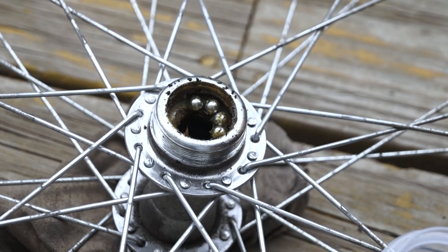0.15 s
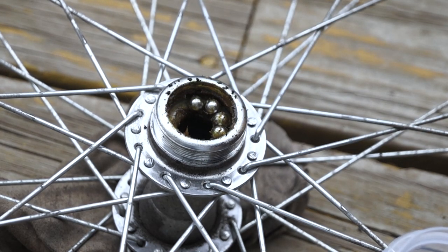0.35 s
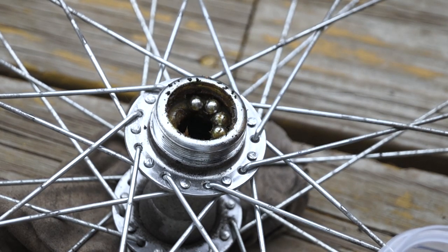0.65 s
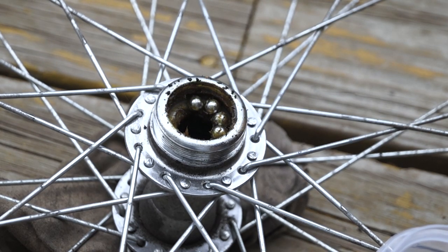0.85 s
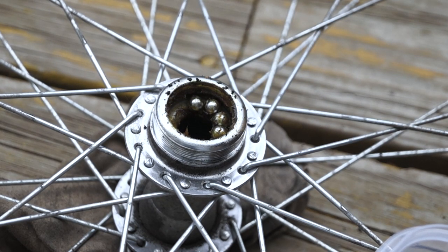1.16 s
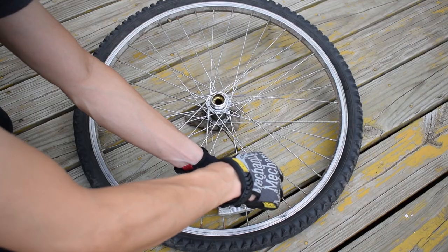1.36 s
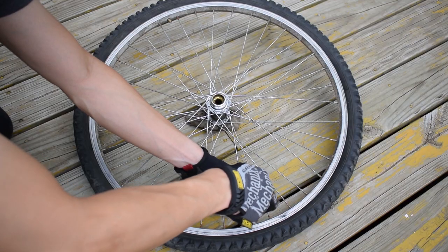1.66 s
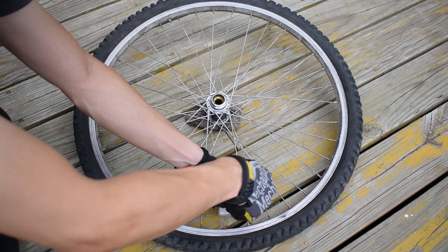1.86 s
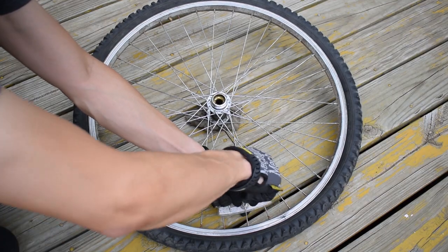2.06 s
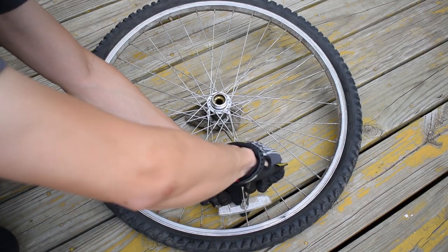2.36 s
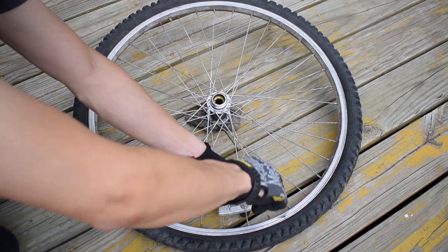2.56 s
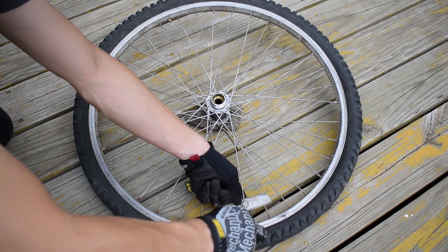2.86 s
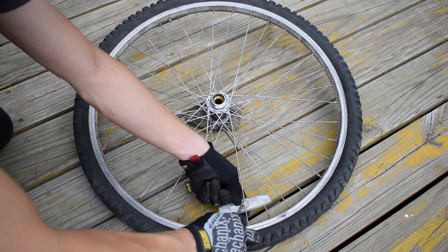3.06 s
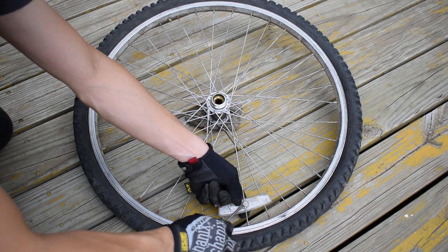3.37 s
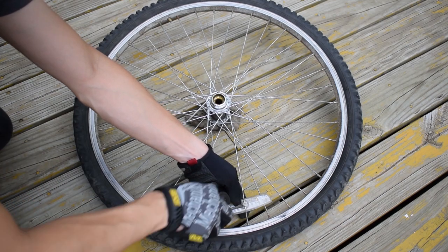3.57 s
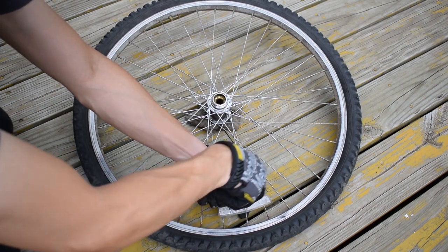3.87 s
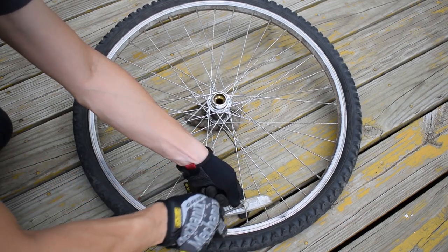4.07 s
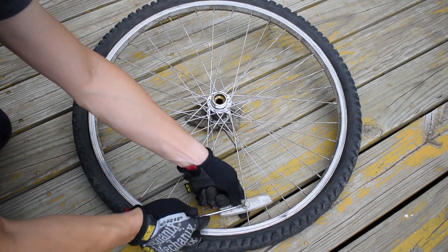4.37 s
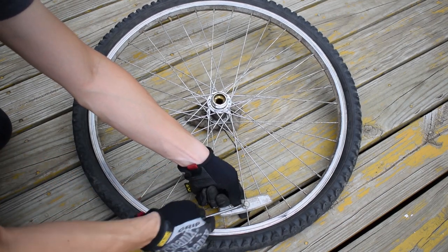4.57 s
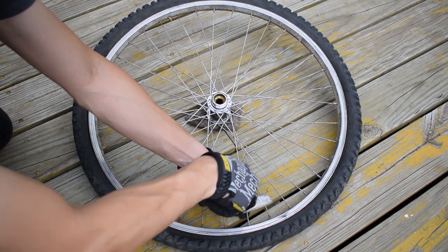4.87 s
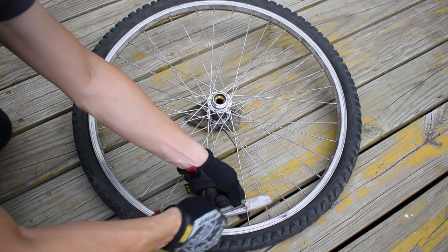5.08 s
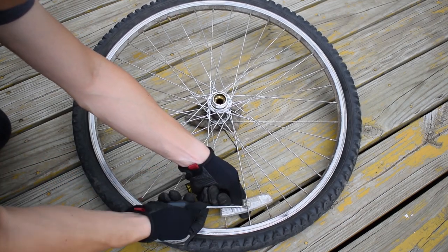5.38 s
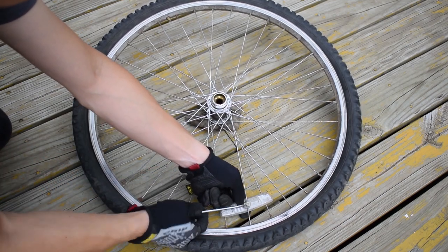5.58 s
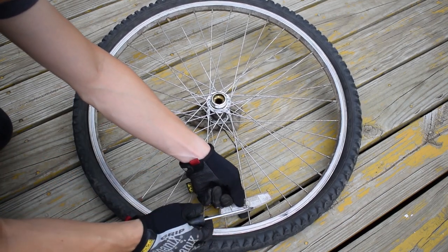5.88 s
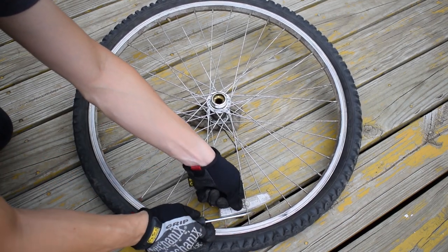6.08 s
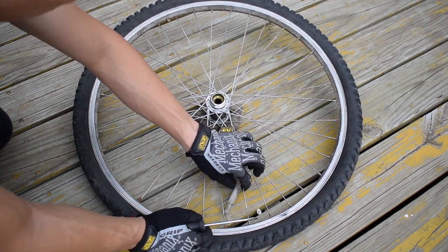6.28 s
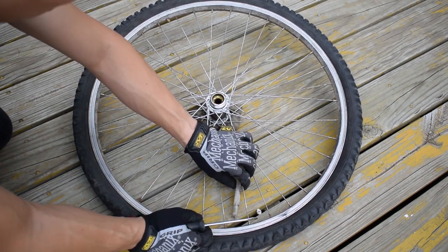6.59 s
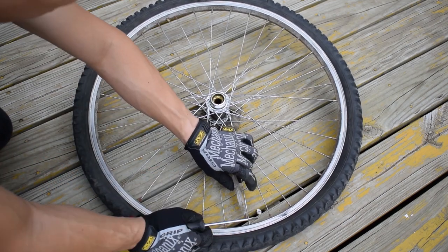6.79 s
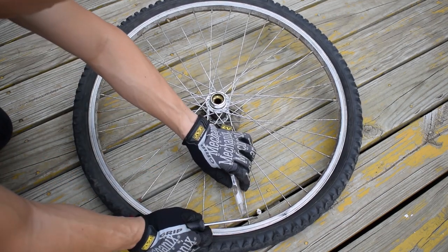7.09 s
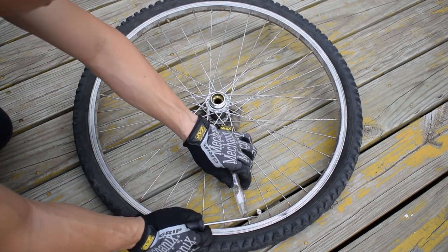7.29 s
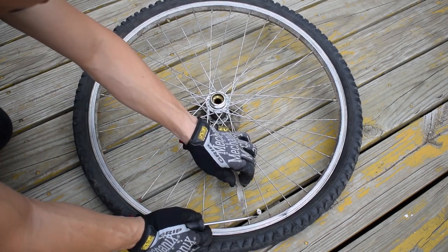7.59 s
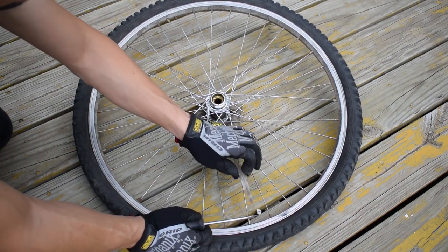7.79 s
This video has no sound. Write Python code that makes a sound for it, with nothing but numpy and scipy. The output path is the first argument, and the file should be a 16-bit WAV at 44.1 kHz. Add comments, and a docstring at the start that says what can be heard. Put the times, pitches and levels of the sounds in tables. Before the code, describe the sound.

Gloved hands work a small metal tool among bicycle spokes on a wooden deck, with sharp clinks, thumps, faint scrapes and quiet air.

```python
"""Tool among bicycle spokes

Gloved hands work a small tool between the spokes of a bicycle wheel lying on a wooden deck.
Struck and dragged steel sounds as sums of decaying modes driven by trains of impulses; the tyre thumps on
the boards as slowly pushed low modes, gloves rub as dense grains, and wind is low noise swelled by gusts.
A duller, wider air of shaped noise, with one knock late in it, cross-fades into the air at the wheel."""
import sys
import numpy as np
from scipy import signal
from scipy.io import wavfile
from scipy.ndimage import uniform_filter1d

SR = 44100
rng = np.random.default_rng(int(sys.argv[2]) if len(sys.argv) > 2 else 0)


def field_ratio(decibels):
    """Amplitude ratio for a level in dB (20 dB per decade); scalars and array-likes work."""
    return 10 ** (np.asarray(decibels, dtype=float) / 20)


def unload_audio(sound):
    """Save the sound as a 16-bit wav file, at the path given as the first command line argument."""
    columns = np.transpose(np.atleast_2d(sound))
    # keep every value between -1 and 1, then stretch to whole-number steps
    steps = np.round(np.clip(columns, -1, 1) * 32767)
    wavfile.write(sys.argv[1], SR, steps.astype(np.int16))


N = 350176
T = np.arange(N) / SR
TWINS = 6  # neighbouring spokes are tuned nearly alike, so each long mode is a small cluster


def evened(x):
    """Normalisation of power: scales to rms 1."""
    return x / np.sqrt(np.mean(x ** 2) + 1e-20)


def read(points, hz):
    """Interpolation of a spectrum on a logarithmic frequency axis."""
    f, value = np.transpose(points)
    return np.interp(np.log(hz + 1), np.log(f + 1), value)


def add(mix, s, sound):
    """Superposition: mixes a sound in at time s."""
    part = mix[round(s * SR):][:len(sound)]
    part += sound[:len(part)]


def rings(hz, t60, phase, size):
    """Free vibration of damped modes: one exponentially dying sine a row, phase in cycles."""
    t = np.arange(size) / SR
    decay = field_ratio(-60 * t / np.c_[t60])
    return decay * np.sin(2 * np.pi * (np.c_[hz] * t + np.c_[phase]))


def peaked(x, db):
    """Peak level: sets the top of the 2 ms envelope to db."""
    return field_ratio(db) * x / np.sqrt(2 * uniform_filter1d(x ** 2, size=88).max())


def thin(x):
    """Weak radiation: thin wire moves little air at low pitch."""
    return signal.sosfilt(signal.butter(5, 1300, "high", fs=SR, output="sos"), x)


def spot_colour(f, pitch_hz, treble_db, boost_db, octaves, overtone, partner):
    """Selective excitation: a spot favours modes near its two pitches; a hard contact adds treble."""
    near = 0
    for pitch, weight in ((pitch_hz, 1), (overtone * pitch_hz, partner)):
        near = near + weight * np.exp(-(np.log2(f / pitch) / octaves) ** 2)
    treble = (treble_db + 21.0) * np.clip(np.log2(f / 5000), 0, 1)
    return field_ratio(boost_db * np.minimum(near, 1) + treble)


def steel(pitch_hz, treble_db, ring_db, overtone, boost_db, octaves):
    """Modal response of the wheel, a row per spot: swarm of short modes, crack, long modes."""
    # long modes of rim and tensioned spokes: pitch_hz, relative level_db, t60_s
    wheel = [(1416, -15, .25), (1495, -11, .2), (1583, -17, .35), (1768, -7, .34), (1960, -16, .3),
             (2085, -9, .22), (2245, -12, .28), (2360, -11, .32), (2471, -11, .3), (2860, -15, .16),
             (3070, -15, .18), (3340, -13, .2), (3590, -15, .19), (4500, -17, .08)]
    # envelope of the countless short modes: pitch_hz, relative level_db
    swarm_levels = [(1100, -19), (1450, -6), (2730, -6.5), (4400, -6.5), (5000, -13), (5700, -13.5),
                    (6500, -14.5), (9330, -15.5), (14000, -25), (16500, -52)]
    # decay of the short modes: pitch_hz, t60_s
    swarm_t60 = [(1740, 0.097), (3000, 0.069), (4590, 0.043), (12100, 0.023)]
    count, size = 400, SR // 2
    hz = np.geomspace(1000, 16500, num=count) * rng.uniform(.995, 1.005, count)
    long_hz, long_db, long_t60 = np.repeat(wheel, TWINS, axis=0).T

    chance = rng.standard_normal((len(pitch_hz), 2 * count + len(long_hz)))
    chance = np.sign(chance) * np.sqrt(abs(chance))  # every mode takes part, with either sign
    swarm_chance, crack_chance, long_chance = np.split(chance, [count, 2 * count], axis=1)

    share = spot_colour(hz, pitch_hz, treble_db, boost_db, octaves, overtone, partner=0.73)
    share = share * field_ratio(read(swarm_levels, hz)) * np.sqrt(hz / 3000)  # log-spread: fewer modes per Hz up high
    t60 = read(swarm_t60, hz) * rng.uniform(.8, 1.25, count)
    swarm = share * swarm_chance @ rings(hz, t60, 0 * hz, size)
    crack = share * crack_chance @ rings(hz, np.full(count, .014), 0 * hz, size)

    # the spoke touched rings most
    picked = spot_colour(long_hz, pitch_hz, treble_db, 12, octaves=.055, overtone=1.395, partner=.65)
    spot = field_ratio(2.5 * long_chance) * (-1) ** np.arange(len(long_hz))
    twin_hz = long_hz + 22 * rng.standard_normal(len(long_hz))
    long = picked * field_ratio(long_db + ring_db) * spot @ rings(twin_hz, long_t60, 0 * long_hz, size)
    return swarm, crack, long


def clinks():
    """Impact excitation: each strike is one blow, a quick chatter and one rebound."""
    # tool or spoke strikes steel: start_s, peak_db (dry), pitch_hz of the struck spot,
    # treble_db (on a scale where -21 is neutral), ring_db of the long modes
    strikes = [(0.9, -39.5, 3300, -26, 2), (1.0391, -36, 3270, -33, -13), (1.739, -15.5, 4300, -24, -14),
               (1.745, -19.5, 3530, -27, 0), (1.857, -37, 1990, -41, 2.5), (1.912, -44, 2920, -16, 8),
               (2.439, -20, 1724, -31, -2), (2.783, -39.5, 2580, -27, -13), (2.896, -29.5, 1940, -46, 2),
               (3.116, -26.5, 3040, -22.5, -18), (3.7331, -32.5, 2760, -21, 7),
               (3.949, -9, 2770, -16.5, -16), (3.952, -12, 1828, -35, 6.5), (4.0971, -16.5, 2630, -21, -11),
               (4.114, -2, 2820, -13, -7), (4.3637, -36, 2900, -35, -22), (4.478, -39.5, 3000, -37, -20),
               (4.541, -38.5, 1850, -38, -12), (4.686, -34.5, 4000, -38, -14), (5.162, -44, 1600, -23, -14),
               (5.2585, -10, 2330, -24, -10.5), (5.6623, -37.5, 2340, -22, 0),
               (5.7999, -31.5, 3570, -32, -3), (6.2877, -23.5, 2320, -29, 3),
               (6.743, -25, 2700, -11.5, -12)]
    rebound_s, rebound_db = .012, -10  # the springy wire throws the tool back for a second, softer blow
    start_s, peak_db, *spot = np.array(strikes).T[:, :, None]
    swarm, crack, long = steel(*spot, overtone=1.466, boost_db=9.5, octaves=0.2)
    t, out = np.arange(1500) / SR, np.zeros(N)
    rise = np.minimum(np.arange(swarm.shape[1]) / (0.00018 * SR), 1)  # contact lasts under a millisecond
    for k, body in enumerate(thin(rise * (swarm + field_ratio(12) * crack + long))):
        hit = rng.random(len(t)) < 600 / SR
        blows = .28 * hit * rng.standard_normal(len(t)) * np.exp(-t / .011)
        blows[[0, round(rebound_s * SR)]] = 1, field_ratio(rebound_db)
        add(out, start_s[k, 0], peaked(signal.fftconvolve(body, blows), peak_db[k, 0]))
    return out


def scrapes():
    """Stick-slip excitation: many small uneven slips under one stroke that rises fast and fades."""
    # wire drags over wire: start_s, peak_db (dry), pitch_hz, length_s, ring_db of the long modes
    drags = [(0.92, -44.5, 3480, 0.048, -6), (1.529, -47, 1910, 0.041, -14), (1.707, -38, 3900, 0.011, -8),
             (1.712, -39, 2190, 0.017, -3), (2.722, -37, 3360, 0.02, 1.5), (3.827, -33.5, 2540, 0.043, -19),
             (4.323, -43, 2170, 0.037, -15), (4.487, -39.5, 1960, 0.0082, -26),
             (5.24, -41.5, 2900, 0.01, -12), (5.559, -46.5, 3270, 0.038, -11),
             (5.628, -42, 3020, 0.032, -9), (5.8, -41.5, 1740, 0.029, -9), (6.077, -50.5, 2800, 0.18, -18),
             (6.286, -25, 3180, 0.046, -4), (6.296, -40, 1416, 0.045, 16), (6.311, -46, 1930, 0.034, -6),
             (7.675, -38.5, 2880, 0.026, -2), (7.695, -46, 2140, 0.022, 12), (7.741, -39.5, 1680, 0.029, 7),
             (7.763, -38, 2260, 0.054, -5), (7.785, -38, 2950, 0.041, -3), (7.797, -44, 3600, 0.038, 9)]
    start_s, peak_db, pitch_hz, length_s, ring_db = np.array(drags).T[:, :, None]
    # a dragged spoke sings in a band
    swarm, crack, long = steel(pitch_hz, -27, ring_db, overtone=1.18, boost_db=11.5, octaves=.16)
    out = np.zeros(N)
    for k, body in enumerate(thin(swarm + field_ratio(4.5) * crack + long)):
        u = np.arange(8000) / SR / length_s[k, 0]  # 0 to 1 along the stroke
        slips = (rng.random(len(u)) < 1200 / SR) * rng.standard_normal(len(u))
        stroke = np.clip(u / 0.15, 0, 1) * np.clip((1 - u) / 1.12, 0, 1)
        add(out, start_s[k, 0], peaked(signal.fftconvolve(body, slips * stroke), peak_db[k, 0]))
    return out


def rattles():
    """Repeated impact: each touch on the rim rings the tool's modes in its own mix, then jitters to rest."""
    # touches of the loose tool: start_s, peak_db (dry), ring_db of the long modes
    touches = [(6.7448, -26, -4), (6.747, -25, 6), (6.7507, -21, 4), (6.7636, -22.5, 0), (6.999, -33, -12),
               (7.007, -35, -10), (7.02, -37.5, -12)]
    # modes of the tool: pitch_hz, relative level_db, t60_s
    tool = [(1406, -20, 0.22), (1509, -12, 0.17), (2250, -19, 0.12), (2471, -22, 0.67), (2418, 9.5, 0.041),
            (2700, 0.5, 0.035), (2950, 8.5, 0.026), (3265, -12, .14), (3900, -4, 0.023), (4800, -6, 0.039),
            (5720, 0, 0.016)]
    hz, db, t60 = np.repeat(tool, TWINS, axis=0).T
    long = t60 > .1
    hz = hz * (1 + np.where(long, .003, .03) * rng.standard_normal(len(hz)))  # short modes: loose clusters
    t, out = np.arange(1200) / SR, np.zeros(N)
    for start_s, peak_db, ring_db in touches:
        share = field_ratio(db + ring_db * long) * rng.standard_normal(len(hz))
        body = share @ rings(hz, t60, 0 * hz, SR // 2)
        hit = rng.random(len(t)) < 500 / SR
        blows = 0.42 * hit * rng.standard_normal(len(t)) * np.exp(-t / 0.018)
        blows[0] = 1
        add(out, start_s, peaked(signal.fftconvolve(body, blows), peak_db))
    return out


def taps():
    """Heavily damped plate modes: short dull rings of the plank, a little different at each spot."""
    # knuckle or tool ticks on wood: start_s, peak_db (dry)
    ticks = [(2.438, -34.5), (2.894, -39), (3.949, -18.5), (4.333, -41), (4.365, -35.5), (4.477, -36.5),
             (4.49, -32.5), (4.541, -39), (5.401, -42), (5.633, -36), (5.65, -39), (5.662, -31.5),
             (5.675, -42)]
    # modes of the plank: pitch_hz, relative level_db, t60_s
    plank = [(526, -4.5, 0.012), (750, 2, 0.0069), (1180, 0, 0.0074), (1708, -11.5, 0.032)]
    hz, db, t60 = np.transpose(plank)
    share = field_ratio(db) * (-1) ** np.arange(len(hz))
    out, spots = np.zeros(N), rng.uniform(0.92, 1.16, (len(ticks), len(hz)))
    for (start_s, peak_db), spot in zip(ticks, spots):
        add(out, start_s, peaked(share @ rings(hz * spot, t60, 0 * hz, size=3000), peak_db))
    return out


def deck(x):
    """Reverberation: boards, rail and wall scatter each sound into a short dense tail."""
    t = np.arange(SR // 3) / SR
    tail = rng.standard_normal(len(t)) * field_ratio(-60 * t / 0.18) * (t > .003)
    tail = signal.sosfilt(signal.butter(1, 4000, fs=SR, output="sos"), tail)
    return x + field_ratio(-17.5) * signal.oaconvolve(x, tail / np.linalg.norm(tail))[:N]


def thumps():
    """Soft impact: a rubber push swells the low modes of tyre and boards over a few milliseconds."""
    # tyre and rim bump the boards: start_s, peak_db, deep_db (gain of the modes below 240 Hz)
    bumps = [(1.742, -30.5, 8.5), (2.441, -28, 4.5), (2.459, -27, 7), (2.495, -36.5, -5),
             (3.834, -27.5, 8.5), (3.951, -20, -5), (4.117, -34.5, -7), (4.333, -37.5, 7), (4.49, -33.5, 7),
             (4.859, -39.5, 7), (5.633, -37.5, -9), (5.664, -38, 17), (6.29, -43, 3), (6.756, -36, 0)]
    # modes of the boards: pitch_hz, relative level_db, t60_s
    boards = [(108, -7.5, 0.27), (205, 2.5, 0.048), (264, 2, 0.14), (304, 3.5, 0.28), (339, -0.5, 0.13),
              (375.8, 1, 0.18), (465, -9.5, 0.18), (644, -8, 0.088), (756, -12, 0.15), (1010, -11, 0.19)]
    hz, db, t60 = np.transpose(boards)
    t, out = np.arange(SR // 2) / SR, np.zeros(N)
    push = 1 - np.exp(-(t / 0.0048) ** 2)
    spots, phases = rng.standard_normal((2, len(bumps), len(hz)))
    for (start_s, peak_db, deep_db), spot, phase in zip(bumps, spots, phases):
        share = field_ratio(db + 2.5 * spot + deep_db * (hz < 240))
        spot_hz = hz * (1 + .015 * spot[::-1])  # each spot of the boards is tuned a little apart
        body = share @ rings(spot_hz, t60, phase, len(t))
        add(out, start_s, peaked(body * push, peak_db))
    return out


def rubbing():
    """Granular friction: dense tiny slips of cloth on wire, each a short ringing grain."""
    # gloves working on wire: start_s, level_db (rms before the silent opening is cut)
    rub = [(.85, -66), (2.1, -83), (3.6, -100), (4.2, -64.5), (5.0, -61.5), (5.8, -69), (6.8, -62.5),
           (7.94, -68)]
    slips = (rng.random(N) < 5000 / SR) * rng.standard_normal(N) * field_ratio(1.5 * rng.exponential(1, N))
    hz = np.geomspace(2500, 4500, num=16)
    kind = rng.integers(0, len(hz), N)
    grains = rings(hz, np.full(len(hz), .012), 0 * hz, size=1200)
    stir = sum(signal.oaconvolve(slips * (kind == k), grain)[:N] for k, grain in enumerate(grains))
    return field_ratio(np.interp(T, *np.transpose(rub))) * (T > rub[0][0]) * evened(stir)


def knock():
    """Impact with early scattering: one dry knock a little to the right with a short blur of echoes."""
    # the knock: start_s, peak_db (mean of both sides), left_minus_right_db
    blow = [(1.3479, -13.5, -2)]
    # modes of the knocked body: pitch_hz, relative level_db, t60_s
    knocked = [(691, -22, 0.15), (1005, -9, 0.14), (1500, -20, 0.09), (534, -25, .05), (790, -3, 0.016),
               (1110, 12, 0.0068), (1850, 13, 0.0043), (2200, 7, 0.0073), (2900, 1.5, 0.0024),
               (4600, -10, 0.0051), (6250, -16.5, 0.0064), (8350, -12, 0.0015)]
    (start_s, peak_db, pan_db), (hz, db, t60) = blow[0], np.transpose(knocked)
    share = field_ratio(db) * (-1) ** np.arange(len(hz))
    sound, out = share @ rings(hz, t60, 0 * hz, SR // 4), np.zeros((2, N))
    t = np.arange(SR // 4) / SR
    echoes = 0.02 * rng.standard_normal((2, len(t))) * field_ratio(-60 * t / 0.16) * (t > .002)
    echoes[:, 0] = 1  # direct sound
    for side, sign in enumerate((1, -1)):
        heard = signal.fftconvolve(sound, echoes[side])
        add(out[side], start_s, peaked(heard, peak_db + sign * pan_db / 2))
    return out


def chirp():
    """Frequency modulation: a thin far peep, a wavering near sine that sags a little."""
    # the peep: start_s, length_s, pitch_hz (before waver and sag), level_db (before its envelope)
    peep = (4.215, .045, 8750, -53)
    start_s, length_s, hz, db = peep
    size = round(length_s * SR)
    u, out = np.arange(size) / (length_s * SR), np.zeros(N)
    waver = 0.066 * uniform_filter1d(rng.standard_normal(size), size=60)
    cycles = np.cumsum(hz * (1 - 0.012 * u + waver)) / SR
    envelope = signal.windows.tukey(size, .5) * (1 - .6 * u)
    add(out, start_s, field_ratio(db) * np.sin(2 * np.pi * cycles) * envelope)
    return out


def fade():
    """Quarter-sine cross-fade: share of the air at the wheel, 0 to 1."""
    start_s, length_s = .765, .78
    return np.sin(np.pi / 2 * np.clip((T - start_s) / length_s, 0, 1))


def air(centre, side, db, edge_hz, patchy_db):
    """Shaped noise: random short-time spectra with drifting patches, as left and right."""
    hz = np.fft.rfftfreq(1024, 1 / SR)
    a, b, c, d, patches = rng.standard_normal((N // 256 + 5, 513, 5)).T
    patches = uniform_filter1d(patches, size=8, axis=0)  # over frequency
    patches = evened(uniform_filter1d(patches, size=14, axis=1))  # over time
    level = field_ratio(read(centre, hz)[:, None] + patchy_db * patches) * (hz < edge_hz)[:, None]
    side_gain = field_ratio(read(side, hz))[:, None]
    z = np.array([a + 1j * b, (c + 1j * d) * side_gain]) * level
    mid, wide = signal.istft(z, nperseg=1024, noverlap=768)[1][:, :N]
    return field_ratio(db) * np.array([mid + wide, mid - wide]) / np.std(mid)


def first_air():
    """Diffuse background noise: the duller, wider yard air, which fades out."""
    # centre spectrum: pitch_hz, relative level_db (per Hz)
    centre = [(41, -43), (70, -11), (107, -0.5), (295, -9), (405, -18.5), (480, -14), (523, -11),
              (1300, -16.5), (2960, -31), (11000, -36.5), (14300, -72), (22000, -120)]
    # width: pitch_hz, side_minus_centre_db
    side = [(60, -42), (240, -4.5), (950, -1), (3770, 4), (15000, -4)]
    return (1 - fade()) * air(centre, side, db=-50, edge_hz=11050, patchy_db=.6)


def wheel_air():
    """Diffuse background noise: the air at the wheel, which fades in."""
    # centre spectrum: pitch_hz, relative level_db (per Hz)
    centre = [(41, -15), (70, -8), (170, -8), (199, -27), (228, -4.5), (293, -13.5), (635, -17),
              (955, -18.5), (1930, -29), (3410, -29.5), (5020, -34), (14000, -37), (16000, -37)]
    # width: pitch_hz, side_minus_centre_db
    side = [(60, -42), (240, -28.5), (950, -21), (3770, -7.5), (15000, -4)]
    return fade() * air(centre, side, db=-51, edge_hz=15800, patchy_db=0.5)


def wind():
    """Turbulent pressure at the microphone: low noise in bell-shaped gusts over a faint breeze."""
    # gusts: top_s, level_db, half_width_s (to 1/e of the top)
    gust_table = [(1.59, -55.5, 0.21), (2.5, -51, 0.13), (2.9, -52, 0.12), (3.36, -50.5, 0.065),
                  (4.45, -54, 0.13), (6.3, -42, 0.043), (6.68, -45, 0.22), (7.379, -49, 0.23),
                  (7.649, -41.5, 0.028)]
    breeze_db = -67.5  # once faded in
    band = signal.butter(2, [13, 65], "band", fs=SR, output="sos")
    low = signal.sosfilt(band, rng.standard_normal(N))
    gusts = sum(field_ratio(db) * np.exp(-((T - top_s) / width_s) ** 2) for top_s, db, width_s in gust_table)
    return (field_ratio(breeze_db) * fade() + gusts) * evened(low)


def scene():
    """Superposition: near sounds sit in the centre; the two airs cross-fade."""
    near = deck(clinks() + scrapes() + rattles() + taps()) + thumps() + rubbing()
    return near + knock() + chirp() + first_air() + wheel_air() + wind()


def low_pass(x):
    """Removes everything above the highest recorded frequency."""
    return signal.sosfilt(signal.butter(12, 16980, fs=SR, output="sos"), x)


def record(dry):
    """Hard overload: the waveform flattens at the full scale of the recorder."""
    full_scale = .88
    mix = np.clip(dry, -full_scale, full_scale)
    return low_pass(mix)


dry = scene()
out = record(dry)
unload_audio(out)
```